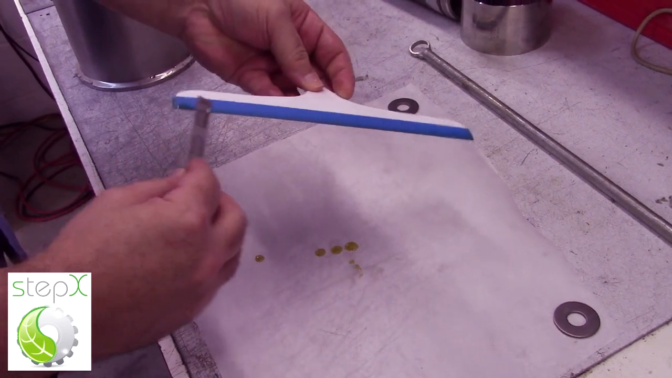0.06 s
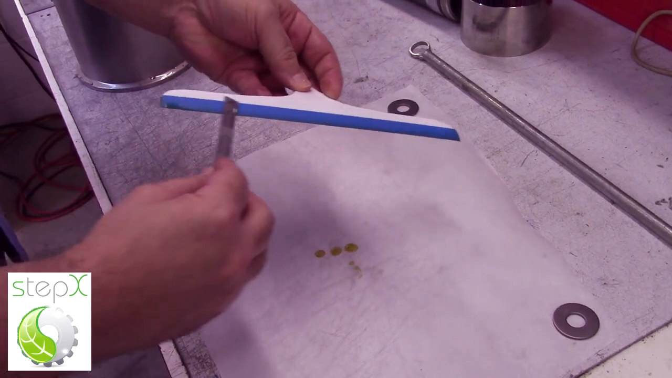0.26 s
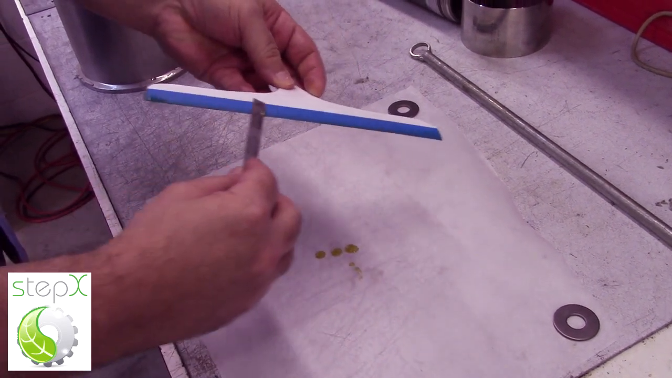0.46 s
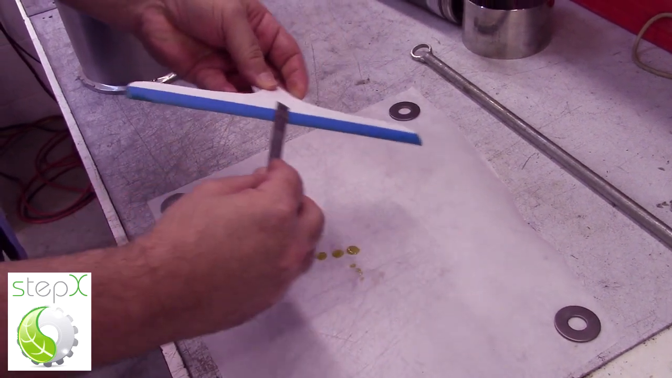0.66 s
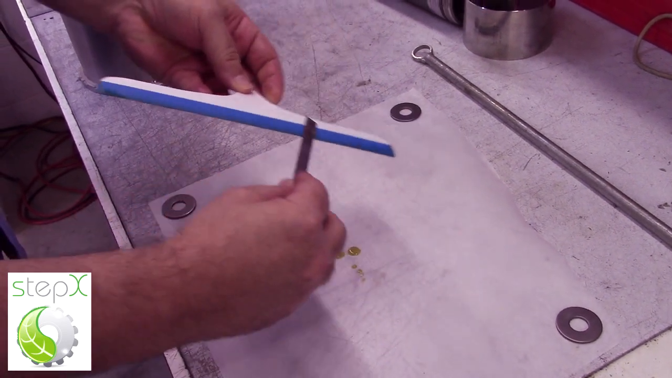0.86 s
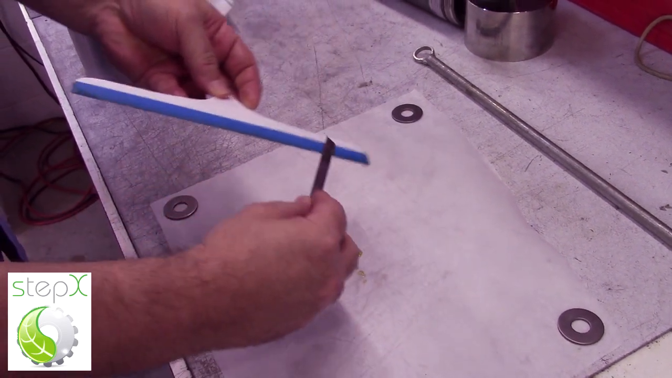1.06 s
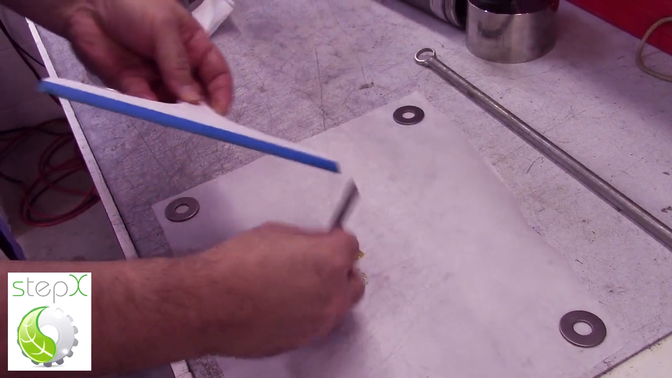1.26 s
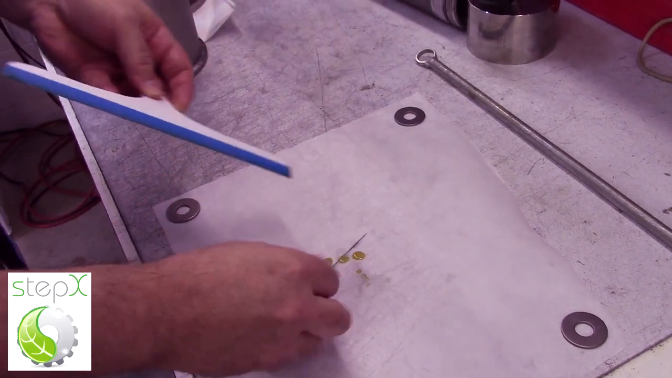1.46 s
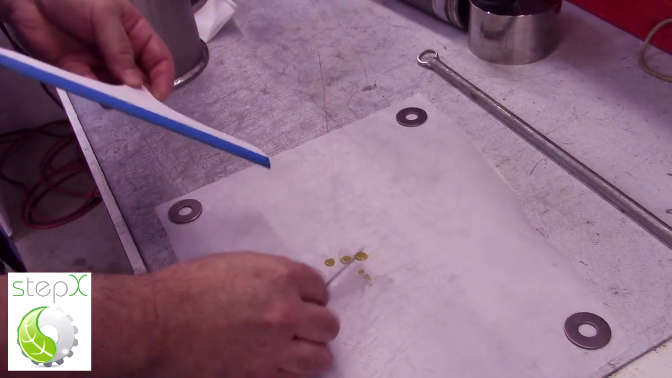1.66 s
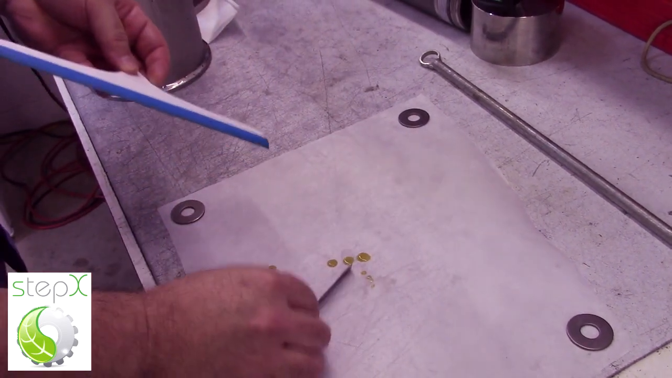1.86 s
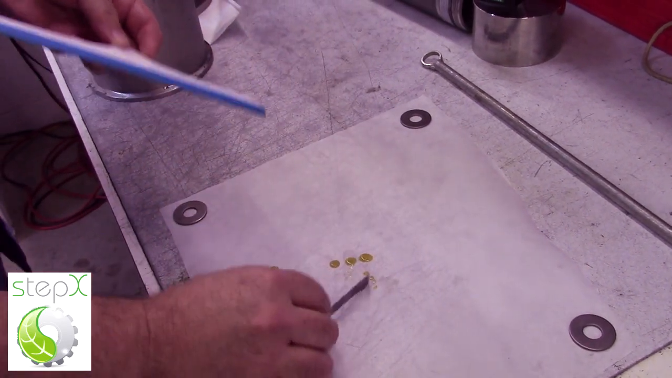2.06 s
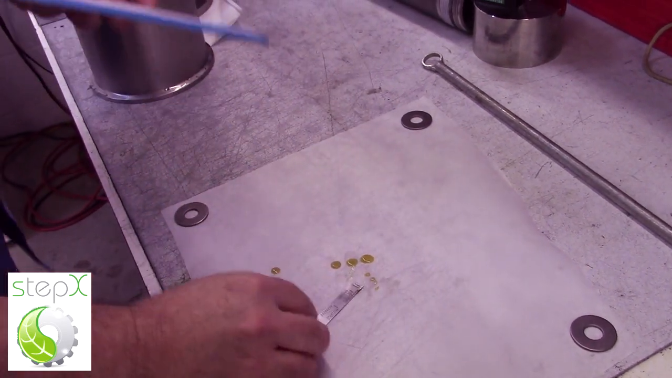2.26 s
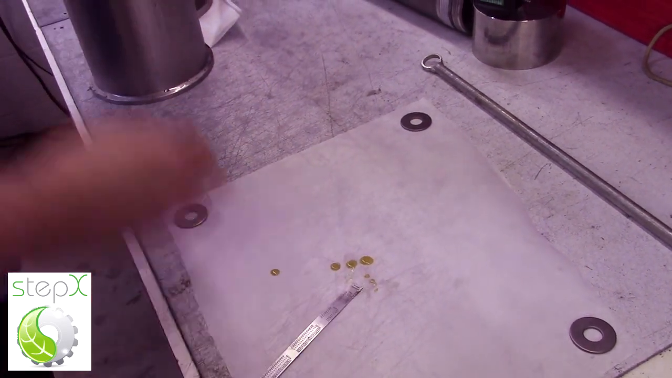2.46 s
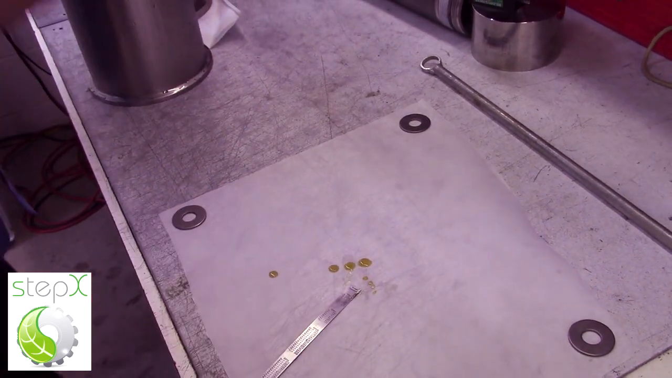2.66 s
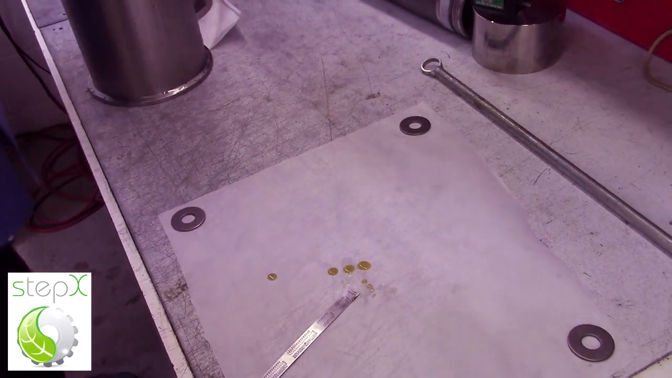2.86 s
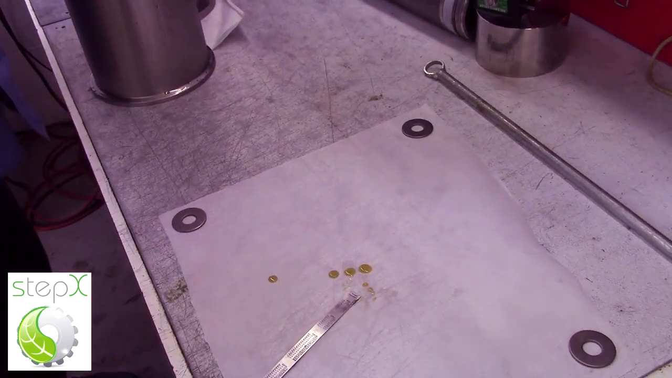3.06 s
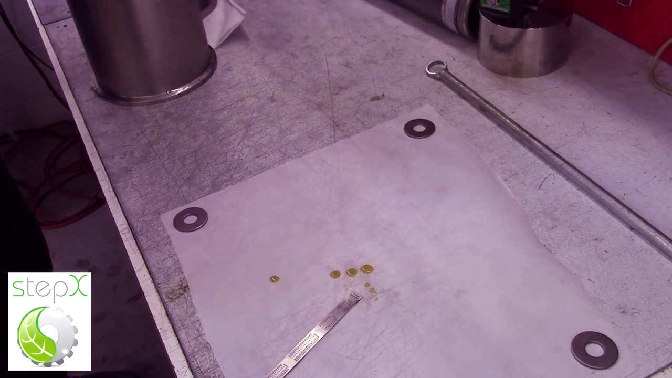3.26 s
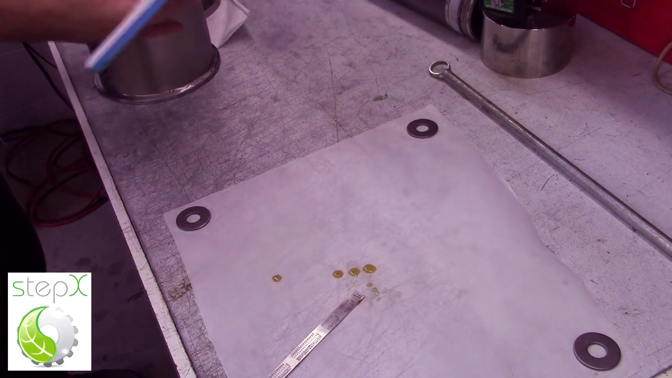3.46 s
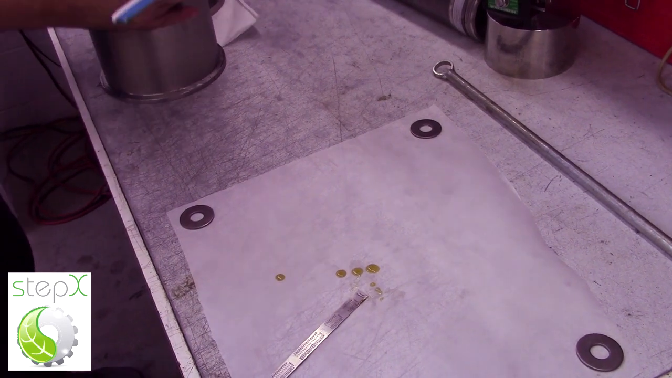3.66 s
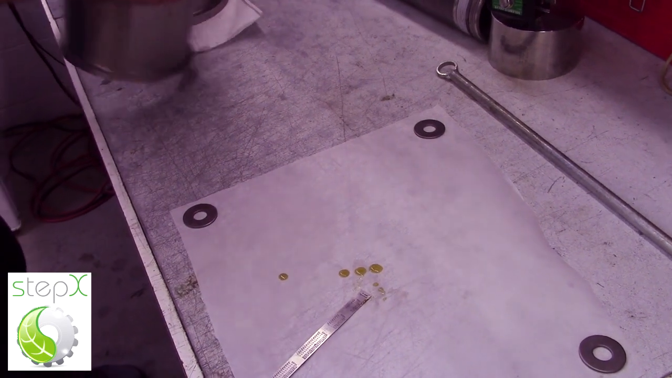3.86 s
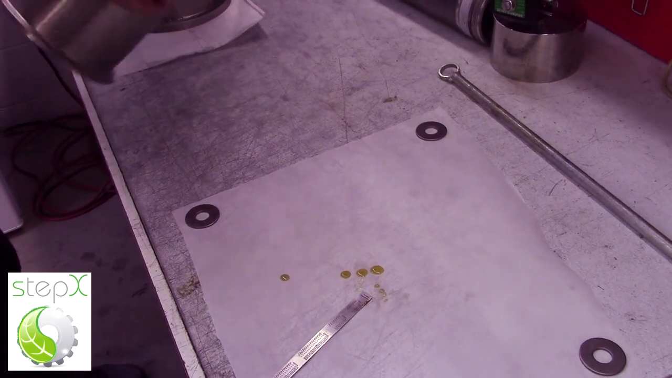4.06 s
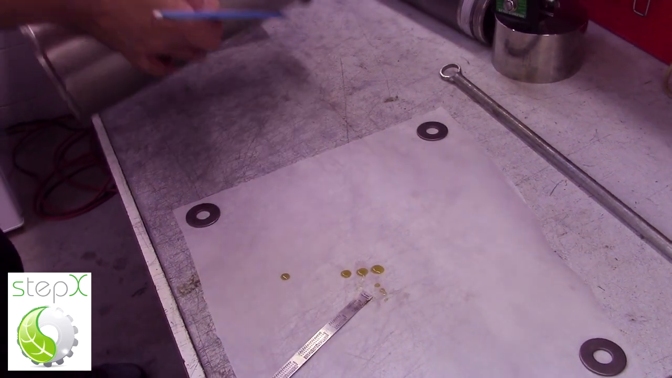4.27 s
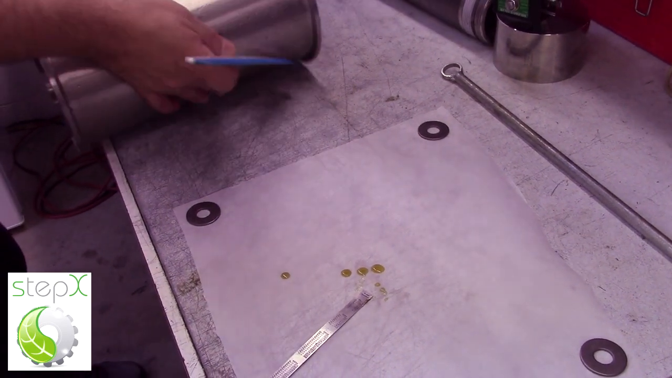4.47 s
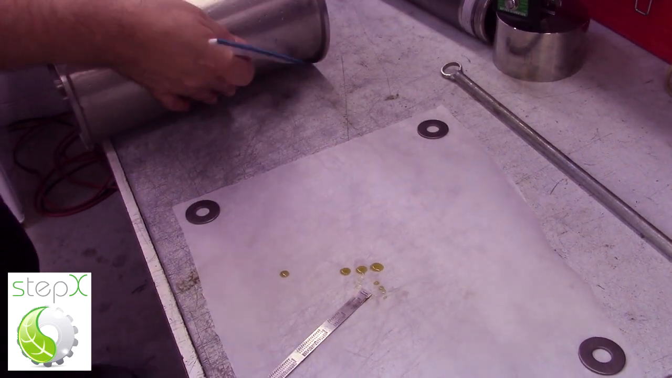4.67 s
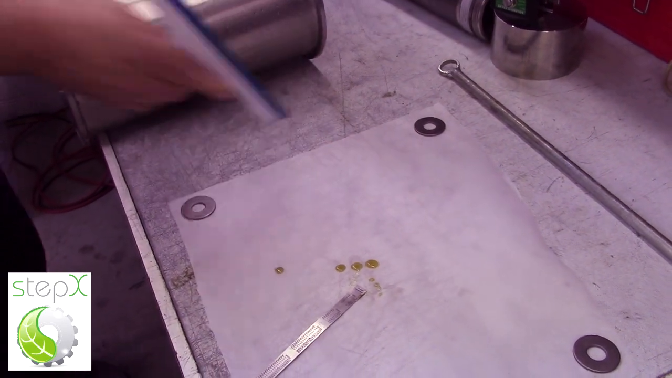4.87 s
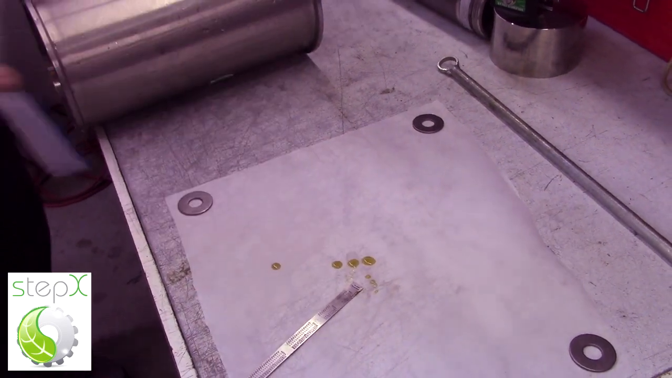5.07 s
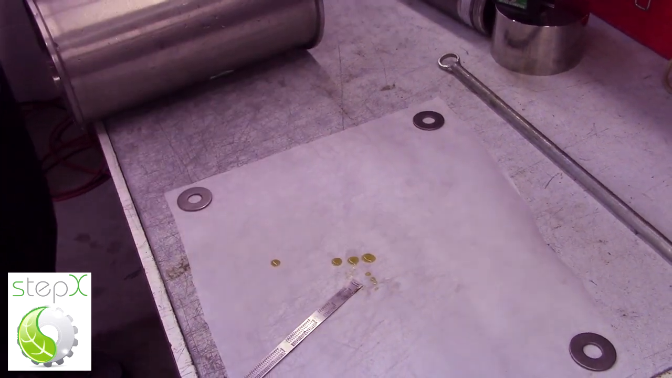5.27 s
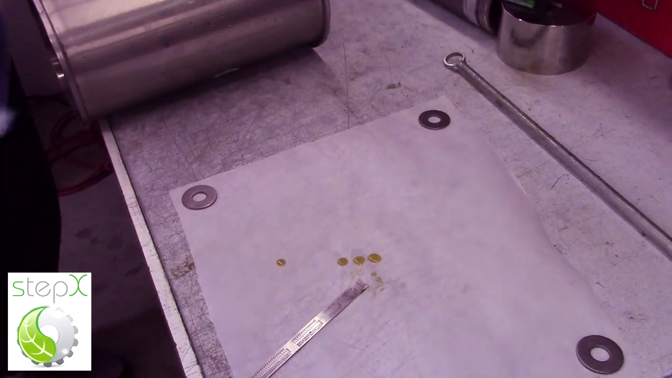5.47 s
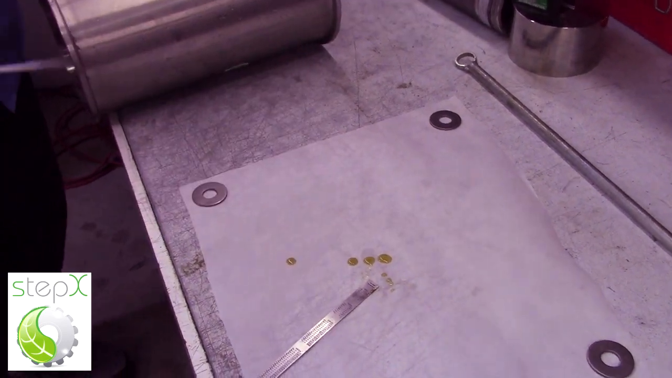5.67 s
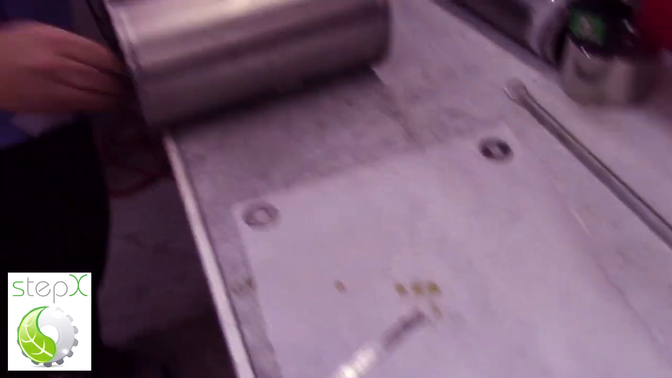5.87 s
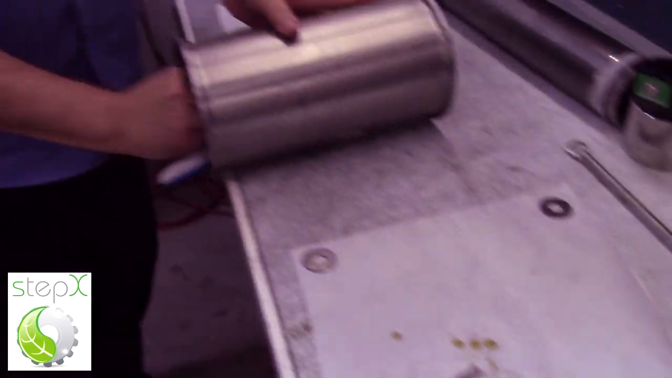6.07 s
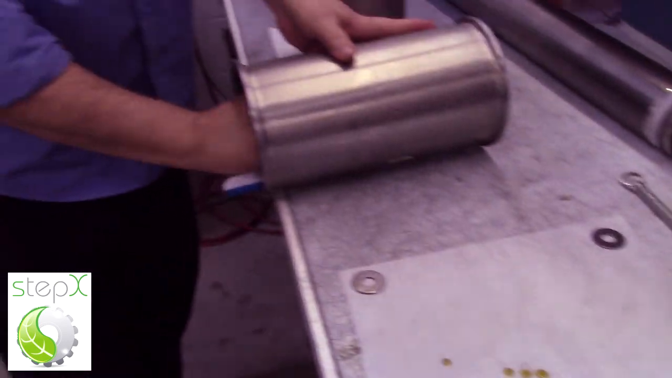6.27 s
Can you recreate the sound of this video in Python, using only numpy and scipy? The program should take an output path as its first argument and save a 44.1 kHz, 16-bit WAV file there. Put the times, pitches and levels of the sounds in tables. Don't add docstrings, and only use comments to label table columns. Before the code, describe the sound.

In a workshop, a thin steel blade scrapes and clatters onto a metal bench, then a hollow steel cylinder clinks and lands with a ringing boom.

```python
import sys
import numpy as np
from scipy import signal
from scipy.io import wavfile

SR = 44100
rng = np.random.default_rng(int(sys.argv[2]) if len(sys.argv) > 2 else 0)


def unload_audio(sound):
    columns = np.transpose(np.atleast_2d(sound))
    steps = np.round(np.clip(columns, -1, 1) * 32767)
    wavfile.write(sys.argv[1], SR, steps.astype(np.int16))


def natural_amplitude(level_db):
    exponent = np.asarray(level_db, float) / 20
    return 10 ** exponent


N = 278271


def rms_one(x):
    return x / np.sqrt(np.mean(x ** 2) + 1e-20)


def at_hz(points, hz):
    points = np.array(points)
    return np.interp(np.log(hz), np.log(points[:, 0]), points[:, 1])


def band(x, low_hz, high_hz, order=2):
    edges_hz = [low_hz, min(high_hz, .45 * SR)]
    return signal.sosfilt(signal.butter(order, edges_hz, "band", fs=SR, output="sos"), x)


def drift(rate):
    knots = rng.standard_normal(int(N / SR * 60) + 3)
    return np.interp(np.arange(N) / SR * rate, np.arange(len(knots)), knots) * 1.2


def ring(clicks, hz, t60):
    radius = natural_amplitude(-60 / (t60 * SR))
    w = 2 * np.pi * hz / SR
    return signal.lfilter([0, np.sin(w)], [1, -2 * radius * np.cos(w), radius * radius], clicks + 1e-18)


def grains(per_s, spread_db):
    sizes = natural_amplitude(spread_db * np.minimum(rng.exponential(1, N), 4)) * rng.standard_normal(N)
    return rms_one(sizes * (rng.random(N) < per_s / SR))


def stroke(start_s, hold_s, level_db, attack_s, release_s):
    span_s = np.array([start_s - 3 * attack_s, start_s + hold_s + 3 * release_s])
    first, last = np.clip(span_s * SR, 0, N).astype(int)
    t, gain = np.arange(first, last) / SR, np.zeros(N)
    away = np.maximum((start_s - t) / attack_s, (t - start_s - hold_s) / release_s)
    gain[first:last] = natural_amplitude(level_db - 30 * np.maximum(away, 0))
    return gain


def struck(blows, modes, wash, centre_hz, gain_db, scatter_db, crack_db, pan_db, wash_share=1):
    s, peak_db, low_db, high_db = np.transpose(blows)
    at = (s * SR).astype(int)
    first, last = at.min(), min(N, at.max() + 2 * SR)
    clear, dense, out = np.zeros(last - first), np.zeros((2, last - first)), np.zeros((2, N))
    luck = rng.standard_normal((len(at), 64))

    def clicks(hz, level_db, k, share=1):
        octaves = np.log2(hz / centre_hz)
        tilt_db = (-octaves * low_db if octaves < 0 else octaves * high_db) * 3
        train = np.full(last - first, 1e-18)
        train[at - first] = natural_amplitude(peak_db + gain_db + level_db + tilt_db + share * scatter_db * luck[:, k])
        return train

    for k, (hz, level_db, t60) in enumerate(modes):
        clear += ring(clicks(hz, level_db, k), hz, t60)
    white = rng.standard_normal((2, 2, N))[..., first:last]
    for k, hz in enumerate(np.geomspace(wash[0][0], wash[-1][0], 12)):
        fade = natural_amplitude(-60 / (at_hz(np.array(wash)[:, ::2], hz) * SR))
        train = clicks(hz, at_hz(wash, hz), 40 + k, wash_share)
        mid, side = signal.lfilter([1], [1, -fade], train) * white[k % 2]
        mid = mid + natural_amplitude(crack_db) * train * np.sqrt(SR / hz) / 4
        apart = np.clip((hz / 26000) ** 0.48, 0, 1)
        noise = band(np.array([mid + apart * side, mid - apart * side]), hz / 1.3, hz * 1.3)
        dense += noise * np.sqrt(SR / hz)
    clear_pan = natural_amplitude([[pan_db / 2], [-pan_db / 2]])
    dense_pan = natural_amplitude([[pan_db / 4], [-pan_db / 4]])
    out[:, first:last] = clear * clear_pan + dense * dense_pan
    return out


def air():
    # f/Hz, level/dB per Hz
    air_spectrum = [(12, -48), (20, -4), (37, -19.5), (71, -2.5), (135, -6.5), (237, -3), (440, -9),
                    (479, -4), (566, -12), (750, -12), (1740, -18), (3520, -22), (10800, -30.5),
                    (15200, -37.5), (16500, -42)]
    # f/Hz, left-right likeness (-1 to 1)
    ear_likeness = [(60, 0.76), (180, 0.02), (550, -0.32), (1650, -0.13), (4970, 0.42), (15000, 0.2)]
    # t/s, level above 2 kHz/dB
    background_level = [
        (0.0, -65.5),
        (.91, -63.5),
        (1.7, -65.5),
        (2.3, -65.5),
        (2.5, -64.5),
        (3.58, -63),
        (4.53, -65.5),
        (5.0, -66),
        (6.31, -64.5),
    ]
    # centre t/s, width/s, level change/dB,
    # f/Hz
    swells = [
        (1.7, 0.28, 14, 40),
        (4.04, 0.19, 8.5, 400),
        (3.4, 0.16, -7, 29),
        (0.57, 0.27, 4.5, 890),
        (0.91, 0.36, -4.5, 280),
        (5.1, 0.076, 7, 64),
        (4.7, 0.1, 11, 55),
    ]
    edges = 20 * 2 ** np.arange(0, 10, .5)
    t = np.arange(N) / SR
    white = rng.standard_normal((2, 2, N))
    out = 0
    for k, (low, high) in enumerate(zip(edges, edges[1:].tolist() + [19000])):
        mid, side = band(white[k % 2], low, high)
        hz = np.sqrt(low * high)
        alike = np.clip(at_hz(ear_likeness, hz), -1, 1)
        swell_db = 0
        for s, width, db, pitch_hz in swells:
            if .3 < hz / pitch_hz < 3:
                swell_db = swell_db + db * np.exp(-((t - s) / width) ** 2 - np.log2(hz / pitch_hz) ** 2 * 2)
        gain = natural_amplitude(at_hz(air_spectrum, hz) + .6 * drift(4) + swell_db)
        out = out + gain * (np.sqrt(1 + alike) * mid + np.sqrt(1 - alike) * side * [[1], [-1]])
    return out * natural_amplitude(np.interp(t, *np.transpose(background_level))) / np.std(band(out.mean(0), 2000, 14000))


def mains_hum():
    # f/Hz, level/dB
    harmonics = [(242.2, -68.5), (360.7, -72.5), (479.1, -72)]
    t, out = np.arange(N) / SR, np.zeros(N)
    for hz, db in harmonics:
        out += np.sqrt(2) * natural_amplitude(db + 2 * drift(8)) * np.sin(2 * np.pi * hz * t + drift(4))
    return out


def vehicle():
    # start t/s, hold/s, first f/Hz, last f/Hz, level/dB
    revs = [
        (0.022, 0.64, 68.7, 79.3, -65),
        (1.317, 0.029, 65.7, 66, -63),
        (2.1, 0.26, 93.3, 100, -64),
        (2.617, 0.4, 108.1, 120, -58),
        (3.045, 0.11, 62, 63, -52.5),
        (3.218, .26, 63.7, 64.5, -59),
        (3.968, 0.38, 68, 70.4, -62.5),
        (3.669, 0.087, 240.2, 242.3, -59),
    ]
    t, out = np.arange(N) / SR, np.zeros(N)
    flutter = np.sqrt(2) * natural_amplitude(1.6 * drift(29))
    for s, hold, first_hz, last_hz, db in revs:
        hz = first_hz + (last_hz - first_hz) * (t - s) / hold
        gain = stroke(s, hold, db, attack_s=0.39, release_s=0.11)
        out += flutter * gain * np.sin(2 * np.pi * np.cumsum(hz) / SR)
    return out


def scrape():
    # start t/s, hold/s, level/dB
    drags = [
        (0.732, 0.22, -64.5),
        (1.224, .006, -53),
    ]
    # f/Hz, width/Hz, level/dB
    lip = [(3000, 410, 8), (3540, 170, 0.5), (5330, 560, -1), (7900, 710, -6), (10300, 1270, -10)]
    slips = grains(2300, 1.0)
    tone = sum(natural_amplitude(db) * rms_one(ring(slips, hz, 2.4 / width)) for hz, width, db in lip)
    return sum(stroke(*row, attack_s=0.12, release_s=0.015) for row in drags) * rms_one(tone)


def spatula_taps():
    # t/s, peak level/dB, low tilt/dB, high tilt/dB
    taps = [(1.228, -41, -10, 0.5), (1.7188, -6, 0.5, -0.5), (1.737, -36.5, -14, 4),
            (1.8822, -6.5, 0.5, 0.5), (1.8885, -19, -27, 1), (1.8911, -2, -26, 1), (1.8965, -25, 4.5, 1.5),
            (1.908, -40, -8, -12), (2.0772, -53, -7, 4.5), (2.0808, -14, -0.5, -4.5), (2.1428, -54, -14, 7),
            (2.1522, -9.5, -2, 1.5), (2.1562, -17, 2, -2.5), (2.2272, -20.5, 1, 2.5),
            (2.249, -33, 2.5, 2.5), (3.095, -38, 3.5, 1.5), (3.356, -47, -7, 2.5), (6.055, -35.5, -2, -23),
            (1.8838, -17, -21, 1), (4.862, -49, -13, 2.5)]
    # f/Hz, level/dB, t60/s
    blade = [(633, -16.5, 0.034), (1117, -8.5, 0.036), (1822, -8.5, 0.076), (1967, -1.5, 0.026),
             (2264, -8.5, 0.0053), (3090, -29, 0.016), (3580, -7.5, 0.014), (4950, -12, 0.0044),
             (5550, -6.5, 0.0048), (7820, -4.5, 0.0046), (9700, -36, 0.0035)]
    # f/Hz, level/dB, t60/s
    blade_wash = [(318, -65, 0.063), (677, -27, 0.23), (1280, -29.5, 0.25), (1780, 0, 0.02),
                  (3620, -7.5, 0.038), (6700, -11.5, 0.021), (11000, -9, 0.0059), (18400, -35, 0.019)]
    sound = struck(taps, blade, blade_wash, centre_hz=2175, gain_db=-14.5, scatter_db=3.5,
                   crack_db=20.0, pan_db=-3.5, wash_share=0.23)
    return band(sound, 340, 11000)


def rubbing():
    # start t/s, hold/s, level/dB, dull part over bright/dB
    rubs = [(1.491, 0.032, -63, 5), (2.477, 0.66, -63.5, -2), (2.89, 0.027, -75, 14),
            (3.1, 0.12, -57.5, -4.5), (3.376, 0.044, -46, -3.5), (3.503, 0.27, -62, -9),
            (3.885, 0.15, -77.5, 12), (4.19, 0.035, -59, -9), (4.31, 0.18, -70.5, 0.5),
            (4.668, 0.075, -56, 5), (4.86, 0.25, -73.5, 13.5)]
    dull = rms_one(band(grains(2900, 2.4), 140, 790))
    bright = rms_one(band(grains(9000, 2.7), 1500, 6700, order=1))
    folds = sum(0.22 * rms_one(band(bright, hz / 1.48, hz * 1.3)) for hz in (3000, 5400))
    bright = rms_one(bright + folds)
    bright = bright * natural_amplitude(2.29 * drift(55))
    out = np.zeros(N)
    for s, hold, db, dull_db in rubs:
        gain = stroke(s, hold, db, attack_s=0.0314, release_s=0.087)
        out += gain * (natural_amplitude(dull_db - 2.5) * dull + natural_amplitude(-5) * bright)
    return out


def bearing_squeak():
    # centre t/s, length/s, level/dB
    chirps = [
        (1.535, .05, -70),
        (1.686, 0.072, -70),
        (2.48, 0.078, -74),
        (5.404, 0.055, -82),
        (6.215, 0.067, -69),
    ]
    t, out = np.arange(N) / SR, np.zeros(N)
    for s, length, db in chirps:
        out += natural_amplitude(db) * np.exp(-((t - s) / (length / 2)) ** 2) * np.sin(2 * np.pi * 5600 * t)
    return out


def skids():
    # start t/s, hold/s, level/dB
    slides = [
        (1.72, 0.011, -34),
        (1.896, 0.0079, -50),
        (1.925, 0.024, -45),
        (1.962, 0.025, -63),
        (1.755, 0.018, -47),
        (3.9, .014, -49),
        (2, 0.0044, -56),
        (2.24, 0.0024, -29),
    ]
    grit = rms_one(band(grains(11000, 1.6), 1730, 16000, order=1))
    return sum(stroke(s, hold, db - 7.5, attack_s=0.0049, release_s=0.026) for s, hold, db in slides) * grit


def soft_knocks():
    # t/s, peak level/dB, low tilt/dB, high tilt/dB
    knocks = [
        (2.7875, -36.5, -1.5, -13),
        (2.8915, -28.5, -8.5, -21),
        (2.905, -40, -5, 0.5),
        (3.782, -32, -11, -4),
        (3.89, -35.5, -18, -12),
        (4.3135, -42.5, -5, 1.5),
        (6.16, -56, -12, -11),
        (6.268, -48, 3, 1),
        (6.283, -56, 0.5, 4),
    ]
    # f/Hz, level/dB, t60/s
    cabinet = [(200, -14.5, 0.033), (282, -1, 0.19), (391, -7, 0.029), (564, 4, 0.05), (782, 0.5, 0.054),
               (1148, -7.5, .02)]
    # f/Hz, level/dB, t60/s
    cabinet_wash = [(120, -9, 0.083), (300, 7, 0.059), (690, -27.5, 0.024), (1405, -14, 0.023),
                    (2880, -39.5, .02)]
    return struck(knocks, cabinet, cabinet_wash, centre_hz=378, gain_db=-11, scatter_db=-3.5,
                  crack_db=-9.0, pan_db=-2.5)


def paper_wipe():
    # t/s, centre f/Hz, level/dB
    path = [
        (3.345, 5700, -72),
        (3.356, 5606, -50),
        (3.368, 5267, -50.5),
        (3.39, 4720, -49),
        (3.42, 4290, -56),
        (3.45, 4000, -59),
        (3.5, 3800, -70),
        (3.56, 3800, -83),
    ]
    # multiple of the centre, width/Hz, level/dB, delay/s
    resonances = [(1, 1200, -0.5, 0.0019), (.64, 1100, -3, 0.008), (1.75, 3100, -6, 0.013),
                  (2.4, 2200, -11, .006), (.17, 560, -1.5, 0.014), (.4, 900, -8.5, 0.0016)]
    s, centre_hz, level_db = np.transpose(path)
    first, last = int(s[0] * SR), int((s[-1] + .05) * SR)
    t, out = np.arange(first, last) / SR, np.zeros(N)
    white = rng.standard_normal((len(resonances), 2, SR // 2))
    for (multiple, width_hz, db, delay_s), noise in zip(resonances, white):
        slow = signal.sosfilt(signal.butter(2, width_hz / 2, fs=SR, output="sos"), noise)[:, :len(t)]
        turn = 2 * np.pi * np.cumsum(multiple * np.interp(t, s, centre_hz)) / SR
        hiss = rms_one(slow[0] * np.cos(turn) + slow[1] * np.sin(turn))
        out[first:last] += hiss * natural_amplitude(db + np.interp(t - delay_s, s, level_db))
    return out


def singing_wall():
    # start t/s, hold/s, level/dB
    rim_rubs = [
        (3.59, .14, -70),
        (3.89, 0.025, -75.5),
    ]
    # start t/s, hold/s, level/dB
    base_rubs = [
        (3.712, 0.091, -70),
        (4.62, 0.064, -55),
    ]
    # start t/s, hold/s, level/dB
    bench_rubs = [
        (4.6, 0.085, -45.5),
    ]
    # start t/s, hold/s, level/dB
    rock_rubs = [
        (4.715, 0.025, -64.5),
    ]
    t, out = np.arange(N) / SR, np.zeros(N)
    friction = grains(5000, 0.82)
    base = np.sqrt(2) * np.sin(2 * np.pi * 1717.0 * t)
    bench = np.sqrt(2) * np.sin(2 * np.pi * 696.0 * t)
    settling_modes = [(1980, 2.0), (2353, -1.0), (3219, 0), (4390, 1.5), (5000, -6.0)]   # f/Hz, level/dB
    settling = sum(natural_amplitude(db) * rms_one(ring(friction, hz, 0.15)) for hz, db in settling_modes)
    upper_modes = [(2370, 4.5), (3225, -8.5), (3560, 2.0), (4390, -11)]   # f/Hz, level/dB
    upper = sum(natural_amplitude(db) * rms_one(ring(friction, hz, 0.051)) for hz, db in upper_modes)
    for tone, rows in [(base, base_rubs), (bench, bench_rubs)]:
        for row in rows:
            out += tone * stroke(*row, attack_s=0.083, release_s=.07)
    for tone, rows in [(upper, rim_rubs), (settling, rock_rubs)]:
        for row in rows:
            out += tone * stroke(*row, attack_s=0.11, release_s=0.17)
    return out


def cylinder_clinks():
    # t/s, peak level/dB, low tilt/dB, high tilt/dB
    clink = [
        (4.1240, -19, -3, -0.5),
    ]
    # f/Hz, level/dB, t60/s
    shell = [(1122, -11, 0.3), (1720, -12, 0.51), (2358, -20.5, 0.36), (2435, -2.5, 0.19),
             (3205, -15, 0.32), (3420, -17, .08), (3570, -14, 0.13), (3800, -15.5, 0.075),
             (4160, -6.5, 0.084), (4360, -13.5, 0.13), (4750, -5, 0.13), (5030, -0.5, 0.097),
             (4960, -18.5, 0.09), (5510, -15, 0.11), (5870, -12.5, 0.21), (6304, -16, 0.16),
             (6627, -16, 0.19), (7564, -20.5, 0.36), (9469, -17, 0.13), (10230, -29, 0.061),
             (11720, -31, 0.11), (8100, -24.5, .1), (8900, -27.5, 0.22)]
    # f/Hz, level/dB, t60/s
    shell_wash = [(1280, -51.5, .06), (1900, -41.5, 0.029), (2980, -8, 0.076), (4940, -6.5, 0.073),
                  (9000, -10.5, 0.16), (12000, -21.5, .06), (16520, -30, .03)]
    # t/s, peak level/dB, low tilt/dB, high tilt/dB
    tick = [
        (5.0932, -42, 0.88, 2.2),
    ]
    # f/Hz, level/dB, t60/s
    rim = [(1750, 0, 0.022), (2408, -3.5, 0.37), (2350, -8.5, 0.37), (4100, -11.5, 0.079),
           (4390, -14, 0.27), (5700, -24, .1)]
    sound = struck(clink, shell, shell_wash, centre_hz=2480, gain_db=-9.5, scatter_db=-2.0,
                   crack_db=20.0, pan_db=1.0)
    sound += struck(tick, rim, shell_wash, centre_hz=2500, gain_db=-7.0, scatter_db=-1.0,
                    crack_db=17, pan_db=1.5)
    return band(sound, 1000, 14000)


def cylinder_landing():
    # t/s, peak level/dB, low tilt/dB, high tilt/dB
    contacts = [
        (4.4968, -21.5, 2.5, -8.5),
        (4.5050, -14.5, 8, 0.5),
        (4.548, -23.5, 5, -2.5),
        (4.712, -43, -14, -4),
        (4.735, -41.5, -12, -1),
    ]
    # f/Hz, level/dB, t60/s
    shell_lying = [(1717, -22.5, 0.23), (2010, -18, 0.1), (2347, -6.5, 0.25), (2420, -0.5, 0.088),
                   (2770, -26, 0.17), (3110, -23, 0.4), (3495, -11.5, 0.27), (4091, -17.5, 0.42),
                   (4387, -9.5, 0.16), (4720, -14.5, 0.2), (5780, -16.5, 0.2), (6550, -10, 0.072),
                   (7806, -20, .3), (8300, -33.5, .18), (9940, -22, 0.17), (10430, -20, .17)]
    # f/Hz, level/dB, t60/s
    lying_wash = [(1310, -31.5, 0.26), (1900, -21.5, 0.31), (2980, -8.5, 0.23), (4940, -9, 0.17),
                  (6500, -9.5, .14), (9000, -12.5, 0.12), (12000, -19, .06), (16520, -28.5, .03)]
    return struck(contacts, shell_lying, lying_wash, centre_hz=2490, gain_db=-15.5, scatter_db=0.0,
                  crack_db=27.5, pan_db=-2.5)


def worktop_thuds():
    # t/s, peak level/dB, low tilt/dB, high tilt/dB
    thuds = [
        (4.500, -35.5, 8.5, -11),
        (4.5057, -5, 0.5, 0.5),
        (4.560, -23, -15, 0),
        (4.585, -28, -11, -9),
    ]
    # f/Hz, level/dB, t60/s
    worktop = [(100, -24, 0.81), (162, -6.5, 0.16), (199, -34.5, 4.7), (224.5, 0, 0.23), (248, -17, 1),
               (264, -18.5, 1.2), (281, -15, 1.04), (304.3, 13.5, 0.085), (346, -19, 0.92),
               (407, -6, 0.094), (442, -30.5, 1.33), (533, 1.5, 0.058), (600, -7, 0.074), (610, -32, 0.57),
               (692, -15, 0.51), (769, -4, 0.065), (910, -2, 0.05), (1029, -5, 0.057), (1170, -14, .08),
               (654, -20, .25), (829, -27.5, .4)]
    # f/Hz, level/dB, t60/s
    worktop_wash = [(100, -21.5, 0.31), (144, -17.5, 0.32), (235, -12.5, 0.6), (486, -11, 0.39),
                    (1017, -5.5, 0.037), (2010, -9.5, 0.05), (4890, -41, 0.22), (11400, -48.5, 0.12)]
    sound = struck(thuds, worktop, worktop_wash, centre_hz=296, gain_db=-10.0, scatter_db=2.5,
                   crack_db=19.5, pan_db=-0.5)
    return band(sound, 120, 15000, order=3)


def room(x, onset_s=0.0022, likeness=0.7):
    # f/Hz, t60/s
    room_t60 = [(100, 0.54), (400, 0.33), (1500, 0.33), (5000, 0.34), (14000, 0.21)]
    # f/Hz, level/dB
    room_colour = [(100, -6), (400, -9), (1500, -6), (5000, -9), (14000, -18)]
    t = np.arange(SR) / SR
    mid, side = rng.standard_normal((2, SR))
    ears = np.sqrt(1 + likeness) * mid + np.sqrt(1 - likeness) * side * [[1], [-1]]
    echo = 0
    for hz in 60 * 2 ** np.arange(9):
        fade = natural_amplitude(at_hz(room_colour, hz) - 60 * t / at_hz(room_t60, hz))
        echo = echo + band(ears, hz / np.sqrt(2), hz * np.sqrt(2), order=1) * fade
    echo = echo * (1 - np.exp(-t / onset_s)) / np.sqrt(SR * 0.02)
    return signal.fftconvolve(x[None], echo, axes=1)[:, :N]


def scene():
    background = air() + mains_hum() + vehicle() + bearing_squeak()
    taps, knocks, clinks = spatula_taps(), soft_knocks(), cylinder_clinks()
    landing, thuds = cylinder_landing(), worktop_thuds()
    near = scrape() + rubbing() + skids() + singing_wall()
    blows = taps + knocks + clinks + landing + thuds
    sent = natural_amplitude(-13.5) * taps + natural_amplitude(-11.5) * knocks + natural_amplitude(-5.5) * clinks + landing + natural_amplitude(-22) * thuds
    echo = room(sent.mean(0) + natural_amplitude(-6.0) * near)
    slightly_right = natural_amplitude([[-.4], [.4]])
    return blows + (near + paper_wipe()) * slightly_right + echo + background


def low_pass(x):
    return signal.sosfilt(signal.butter(12, 16780, fs=SR, output="sos"), x)


def record(dry):
    heard = signal.sosfilt(signal.butter(4, 15000, fs=SR, output="sos"), dry)
    heard = signal.sosfilt(signal.ellip(6, .5, 22, 15900, fs=SR, output="sos"), heard)
    rounded = 1.15 * np.tanh(heard / 1.15)
    return low_pass(rounded)


dry = scene()
out = record(dry)
unload_audio(out)
```